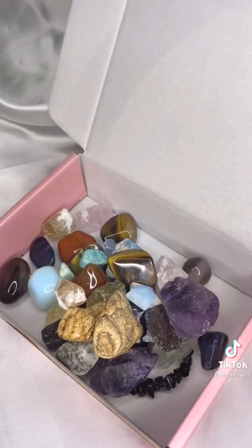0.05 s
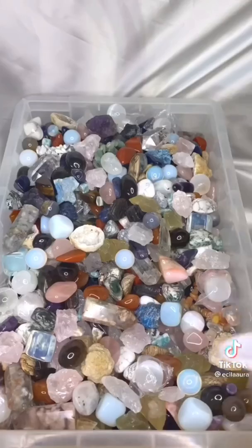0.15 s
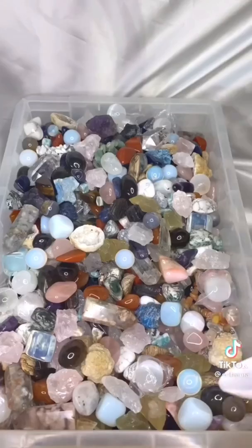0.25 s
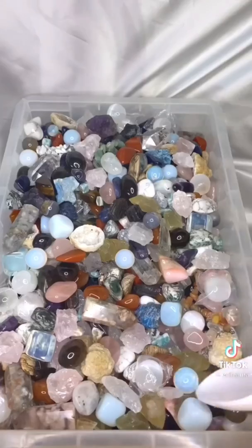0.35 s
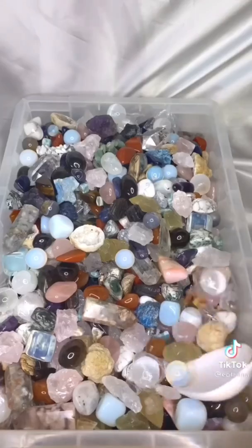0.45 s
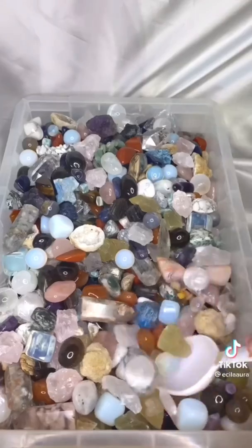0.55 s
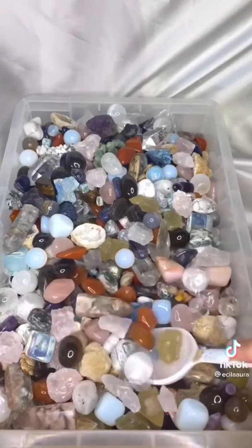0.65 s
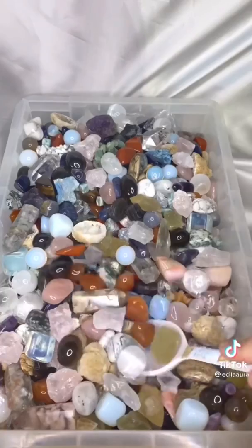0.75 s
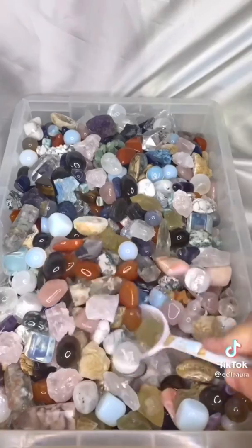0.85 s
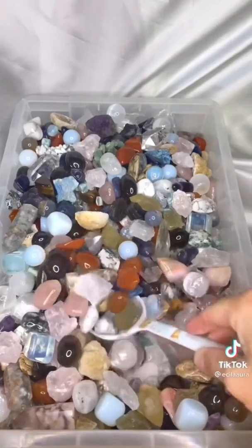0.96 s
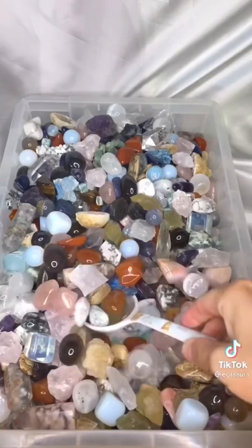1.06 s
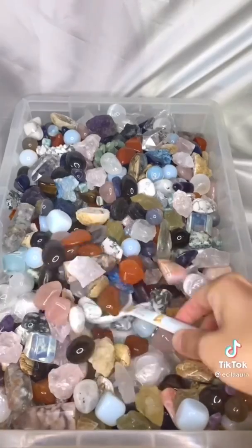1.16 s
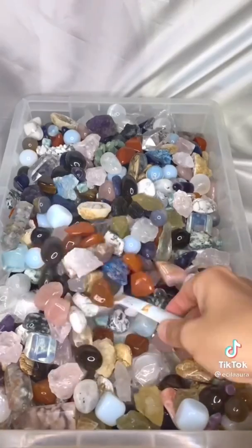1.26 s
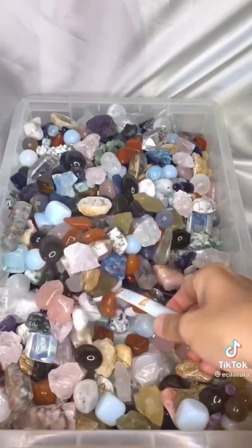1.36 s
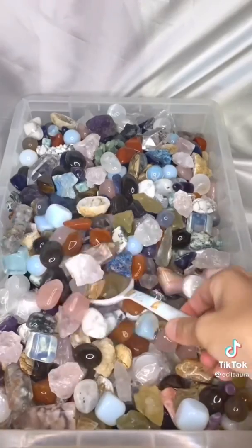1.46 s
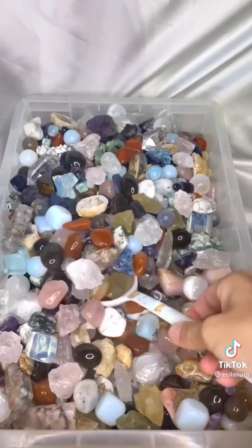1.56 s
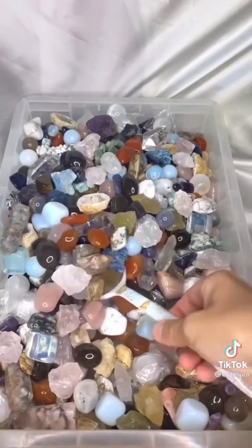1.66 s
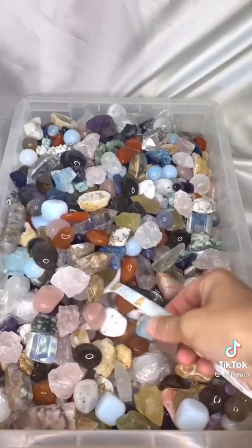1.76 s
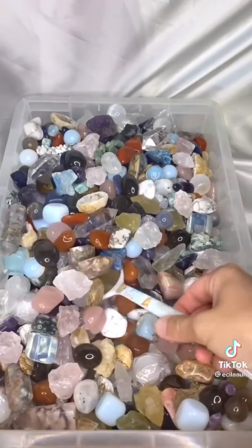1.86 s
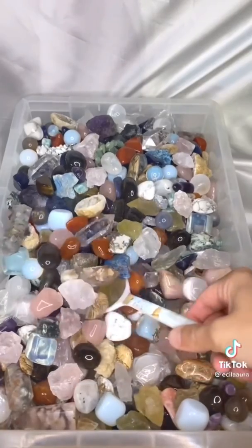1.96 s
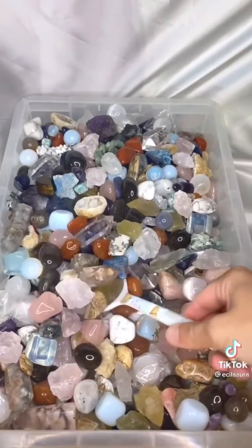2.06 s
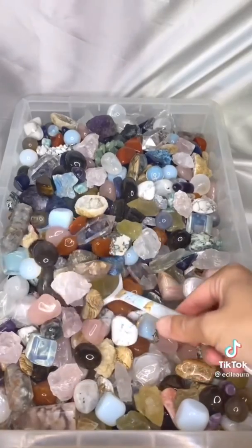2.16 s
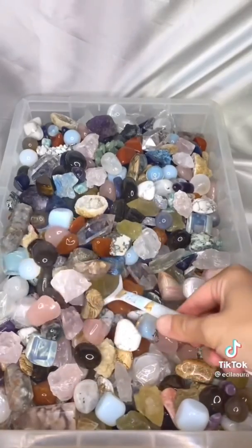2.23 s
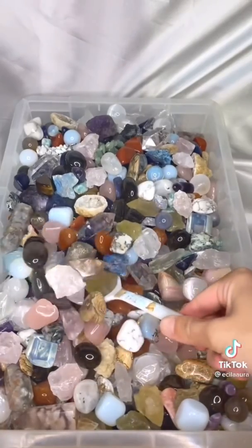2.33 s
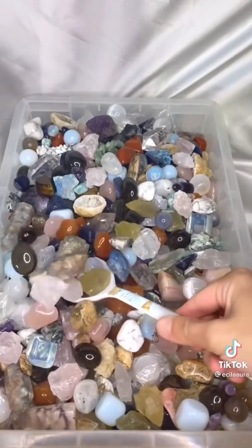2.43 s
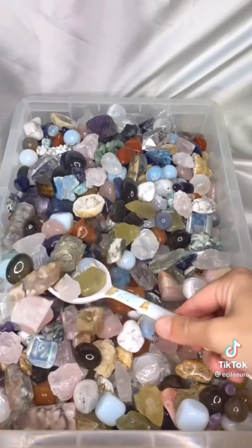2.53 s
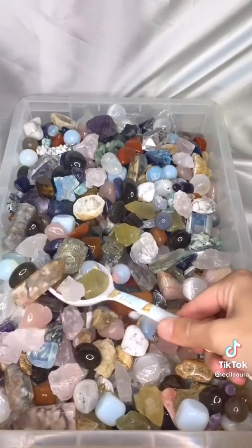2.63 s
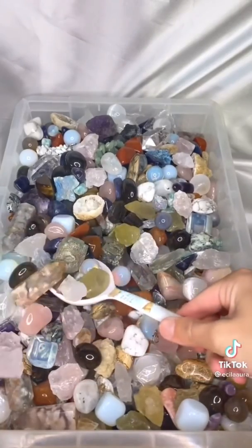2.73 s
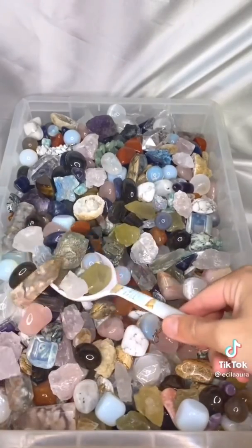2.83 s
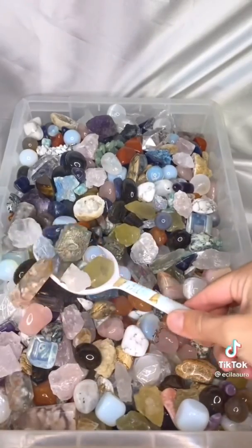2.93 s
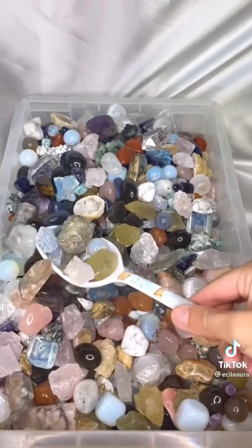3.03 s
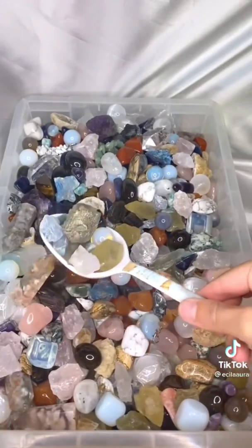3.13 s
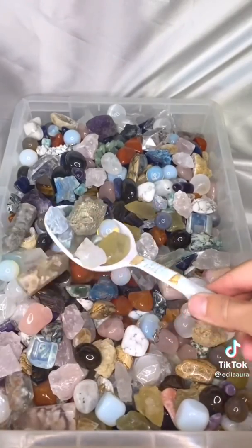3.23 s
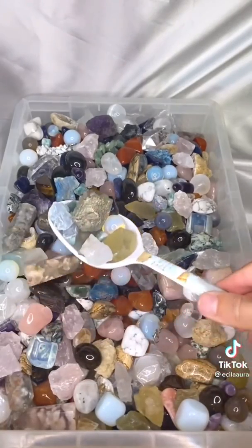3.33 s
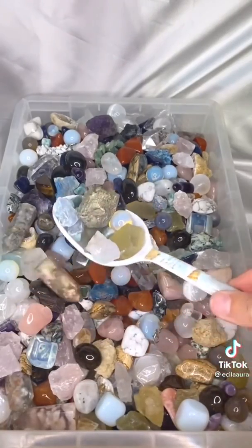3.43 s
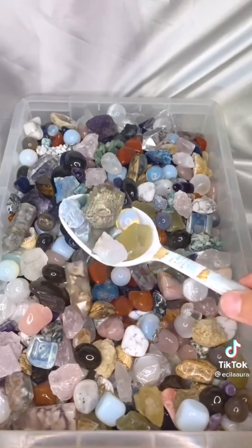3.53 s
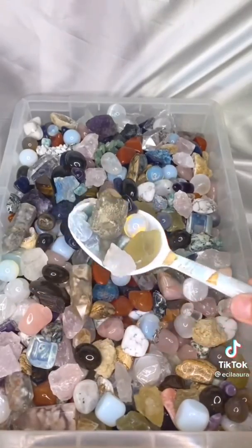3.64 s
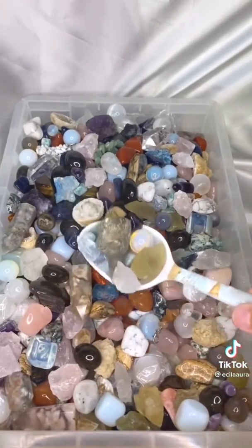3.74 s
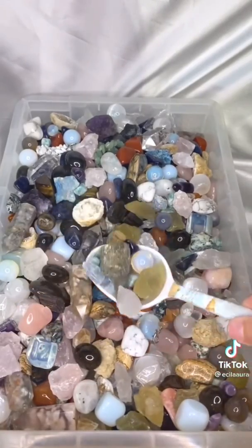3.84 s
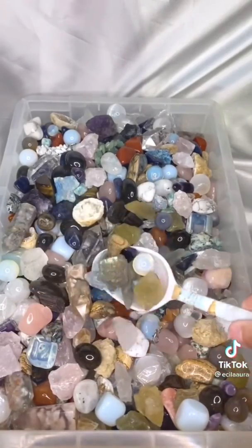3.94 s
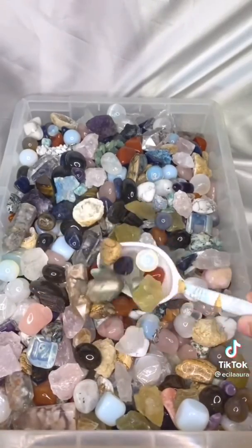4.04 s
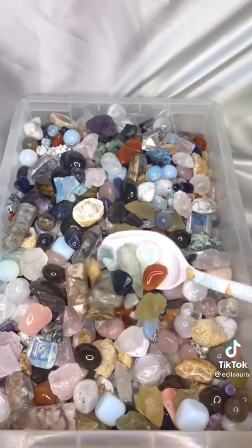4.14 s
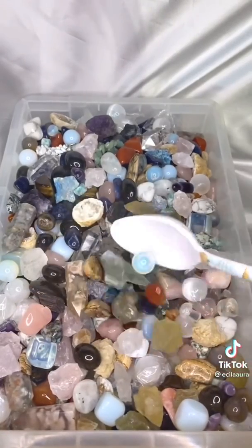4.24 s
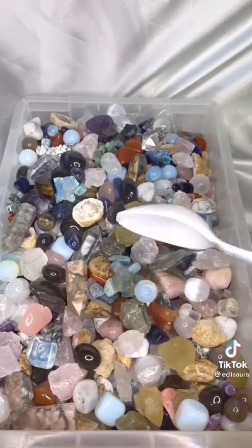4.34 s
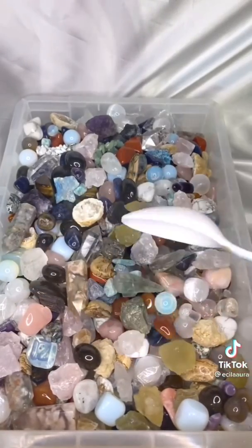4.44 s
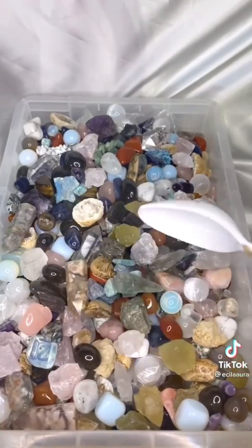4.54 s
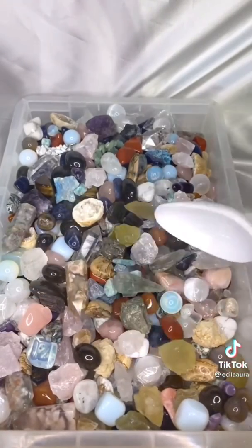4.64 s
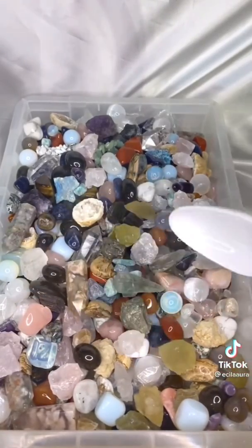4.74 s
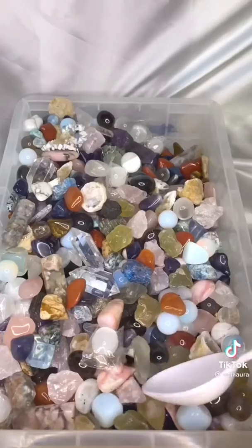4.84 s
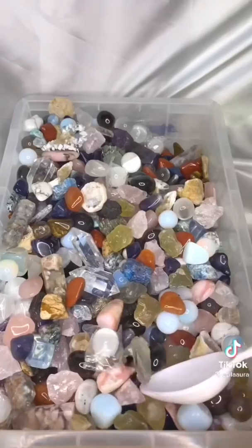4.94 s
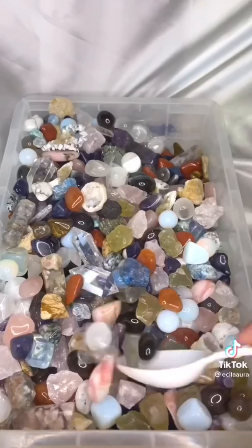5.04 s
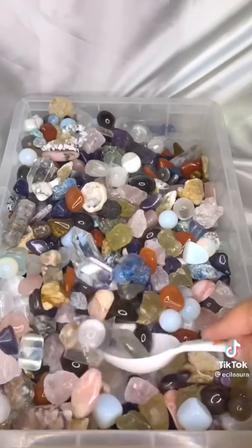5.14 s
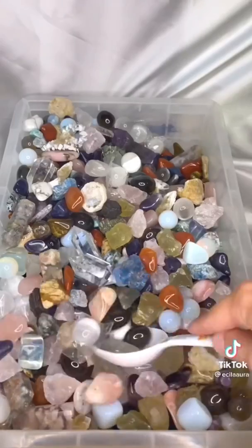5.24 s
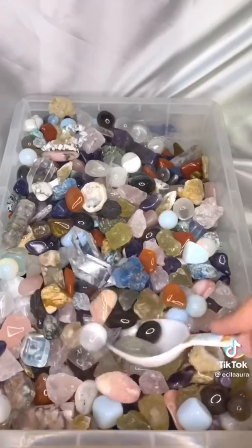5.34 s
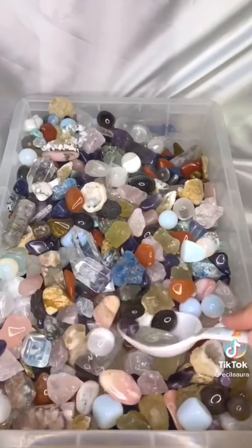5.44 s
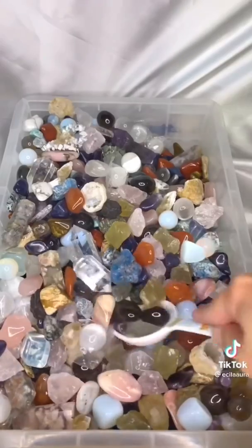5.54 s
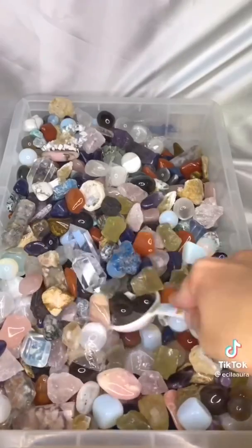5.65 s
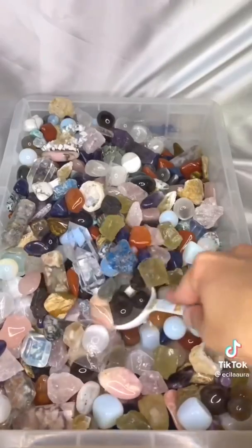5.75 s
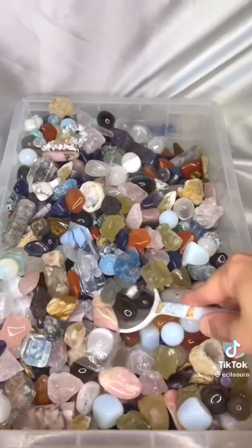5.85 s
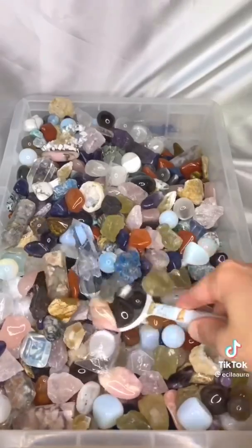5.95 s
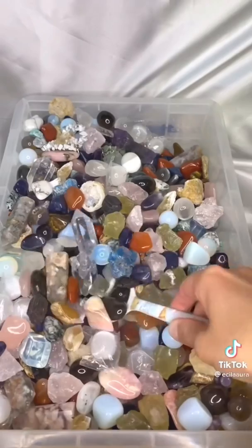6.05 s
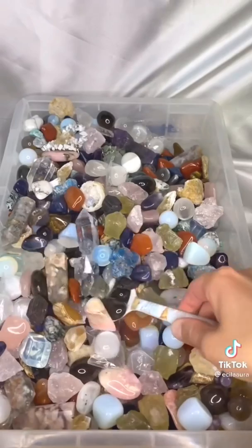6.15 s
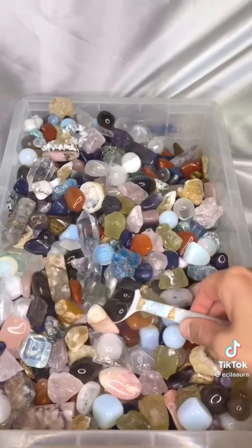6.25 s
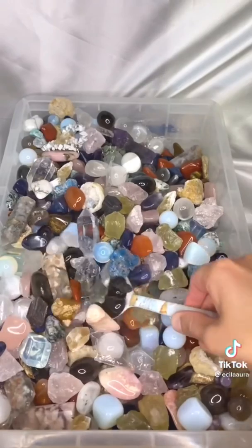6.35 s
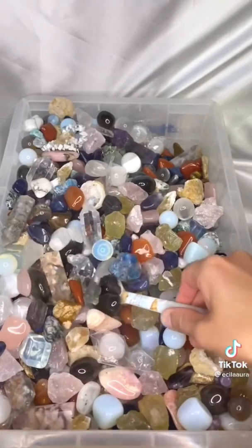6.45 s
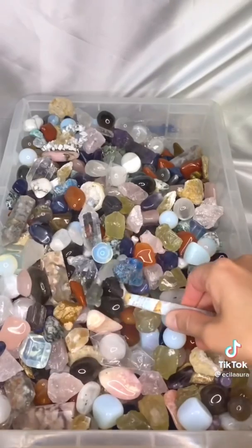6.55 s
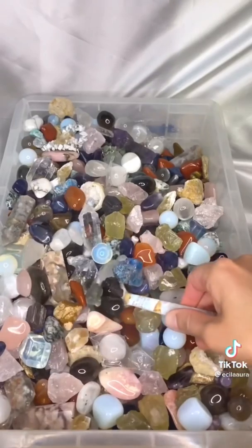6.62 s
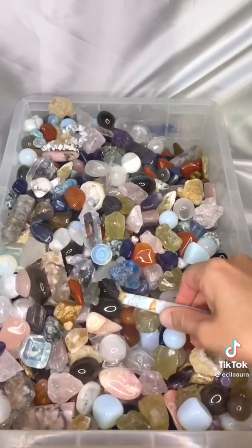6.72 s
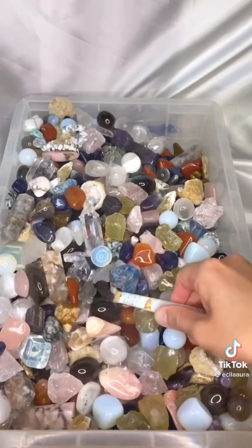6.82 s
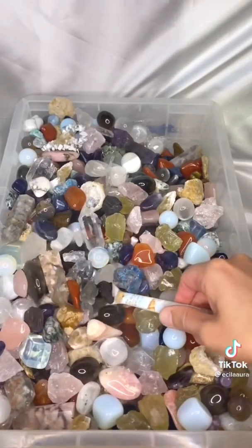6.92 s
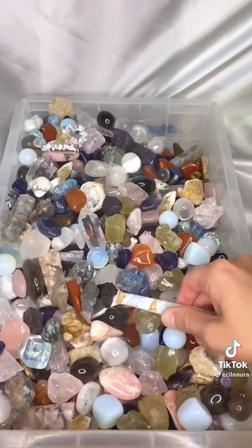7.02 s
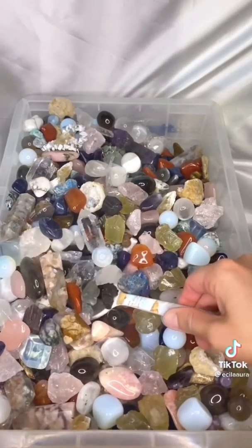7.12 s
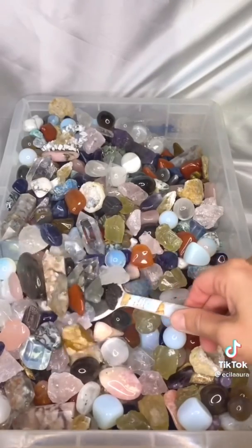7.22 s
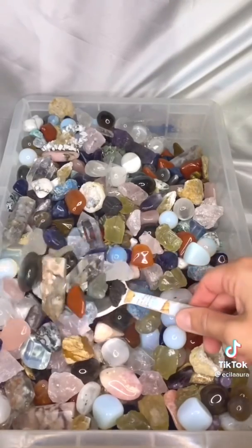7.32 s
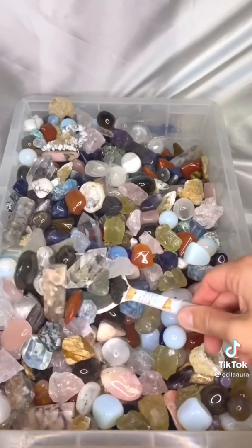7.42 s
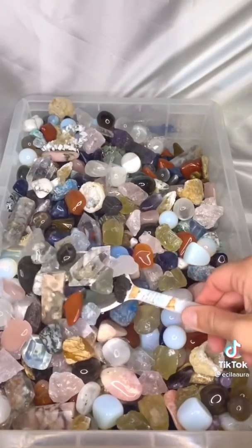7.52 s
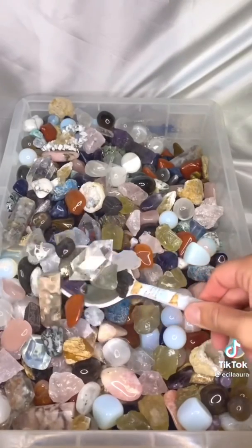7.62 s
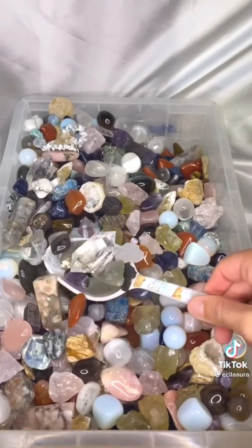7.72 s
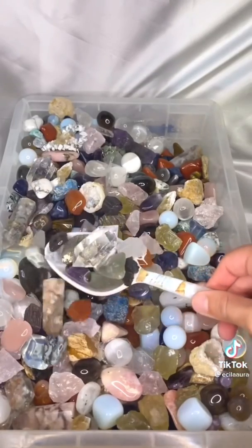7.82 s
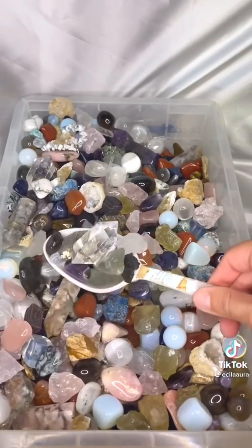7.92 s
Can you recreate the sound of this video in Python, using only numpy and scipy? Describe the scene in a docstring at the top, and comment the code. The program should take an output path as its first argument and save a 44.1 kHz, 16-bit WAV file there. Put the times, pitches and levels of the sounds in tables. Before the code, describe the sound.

Dense clatter of smooth pebbles being scooped, lifted and tipped back in a plastic bin, with a brief lull before digging starts again, recorded close.

```python
"""First a faint low rumble with a trace of hiss and a very faint rising squeak, then a loose stone rings. A
plastic scoop digs through a tub of polished stones, lifts a load, tips it back and digs again, close to two
microphones in a small room. Each clink is a knock of the packed heap, a clack of damped modes and a bright
tick. Loose stones ring with one pitch; pushed ones crunch in a dense random stream, and sliding ones sing. The
blows drive the tub's low resonances, soft thuds sound beneath, and a noise tail makes the room."""
import sys
import numpy as np
from scipy import signal
from scipy.fft import rfft, irfft
from scipy.io import wavfile
from scipy.ndimage import uniform_filter1d

SR = 44100
rng = np.random.default_rng(int(sys.argv[2]) if len(sys.argv) > 2 else 0)


def waveform_to_disk(signal):
    """Save audio, clipped to [-1, 1], as 16-bit WAV at the path in sys.argv[1]."""
    frames = np.transpose(np.atleast_2d(signal))
    scaled = np.clip(frames, -1, 1) * 32767
    samples = np.round(scaled).astype(np.int16)
    wavfile.write(sys.argv[1], SR, samples)


N = 351918
TIME = np.arange(N) / SR
AGE = np.arange(640) / SR  # s since a contact began
CONTACT_SAMPLES = .005 * SR  # a contact at 0 dB has the energy of 5 ms at rms 1
SCATTER_S = 0.0026  # how long reflections linger inside the tub
KNOCK_HZ = 888  # middle pitch of the clinks' knocks, and reference pitch for ringing stones


def from_db(db):
    """Amplitude ratio of a level in dB."""
    return 10 ** (np.asarray(db) / 20)


def rms_one(x):
    """Scale a signal to rms 1."""
    return x / np.sqrt(np.mean(x ** 2) + 1e-20)


def at_hz(rows, hz):
    """The columns of a table, read on a log-frequency axis."""
    points, *columns = np.transpose(rows)
    return np.array([np.interp(np.log(hz + 1), np.log(points), column) for column in columns])


def butter(x, hz, kind):
    """Filter with a second-order Butterworth design."""
    return signal.sosfilt(signal.butter(2, hz, kind, fs=SR, output="sos"), x)


def add(track, s, sound):
    """Mix a short sound into the stereo track at time s."""
    i = max(int(s * SR), 0)
    track[:, i:i + sound.shape[-1]] += sound[:, :max(N - i, 0)]


def floor():
    """A faint low rumble, alike at both microphones, under a trace of stereo hiss."""
    rumble = rms_one(butter(rng.standard_normal(N), 110, "low"))
    hiss = rms_one(butter(rng.standard_normal((2, N)), [300, 4500], "band"))
    return from_db(-64) * rumble + from_db(-77.5) * hiss


def squeak(s, length_s, db, hz, rise_hz_per_s):
    """A very faint squeak rises just before the first stone: two harmonics roughened by noise."""
    age = np.clip(TIME - s, 0, length_s)
    phase = 2 * np.pi * np.cumsum(hz + rise_hz_per_s * age) / SR
    grip = 1 + .5 * rms_one(butter(rng.standard_normal(N), 200, "low"))
    swell = np.sqrt(abs(np.sin(np.pi * age / length_s)))
    return from_db(db) * grip * swell * (np.sin(phase) + .5 * np.sin(2 * phase))


def reflection_spread():
    """Swell and decay of the quick reflections inside the tub, with unit energy."""
    spread = np.sqrt(AGE) * np.exp(-AGE / SCATTER_S)
    return spread / np.linalg.norm(spread)


def contacts(low_hz, high_hz, pitch, rock_s, cycles, unlike, scatter, order):
    """Stereo contacts of stones of relative `pitch`: `order` damped modes each, scattered inside the tub."""
    place, delay, damping = rng.random((3, len(pitch), order, 1))
    shared, apart = rng.standard_normal((2, len(pitch), order, 1))
    octave_share = (np.arange(order)[:, None] + place) / order
    hz = pitch[:, None, None] * low_hz * (high_hz / low_hz) ** octave_share
    # an uneven stone rocks onto several points in quick succession; its neighbours damp it within a few cycles
    age = np.maximum(AGE - rock_s * delay ** 2, 0)
    decay = hz / (cycles * 2 ** (2 * damping - 1))
    modes = np.sqrt(decay) * np.exp(-decay * age) * np.sin(2 * np.pi * hz * age)
    # every mode radiates a little differently towards each microphone
    weight = np.sign(shared) + unlike * apart * np.array([1, -1])
    sound = weight.transpose(0, 2, 1) @ modes
    # each spot in the tub has its own quick reflections off walls and other stones
    common = rng.standard_normal((len(pitch), 1, len(AGE)))
    echoes = common + unlike * rng.standard_normal((len(pitch), 2, len(AGE)))
    reflected = signal.fftconvolve(sound, echoes * reflection_spread(), axes=-1)[..., :len(AGE)]
    sound = butter(sound + scatter * reflected, low_hz * 0.5, "high")
    energy = np.mean(np.sum(sound ** 2, axis=-1, keepdims=True), axis=1, keepdims=True)
    return sound / np.sqrt(energy / CONTACT_SAMPLES)


def stones(count, rock_s, cycles, order):
    """Clack and tick of assorted stones; each clack has `order` modes that ring for about `cycles`."""
    pitch = 2 ** (.22 * np.clip(rng.standard_normal(count), -1.6, 1.2))
    clack = contacts(1714, 6465, pitch, rock_s, cycles=cycles, unlike=0.29, scatter=0.78, order=order)
    tick = contacts(6800, 15000, np.ones(count), rock_s, cycles=10.0, unlike=.25, scatter=.8, order=8)
    return clack, tick


# loose stones that ring with one clear pitch: t/s, ring level/dB, f/Hz, clack level/dB relative to the ring
RINGING_STONES = [(0.1808, -20, 890, -4), (0.6578, -28, 1370, 0), (0.9718, -22.5, 890, -19),
                  (1.2564, -16.5, 824, -7), (2.0934, -30.5, 1250, -4), (2.449, -15, 1135, -11),
                  (2.474, -23.5, 1170, -19), (2.5069, -18, 1155, -5.5), (2.946, -31.5, 2863, 4),
                  (3.4614, -38.5, 1710, -11), (3.699, -43.5, 2790, 3), (3.7813, -43, 2900, -10),
                  (3.8194, -33, 2780, 4), (4.848, -31, 4005, -4), (5.1612, -16.5, 3682, -13),
                  (6.391, -22, 950, -34), (6.881, -27.5, 2820, 3.5), (6.9305, -22, 1227, -4.5),
                  (6.9458, -20, 830, -16), (7.002, -22.5, 1150, -4.5), (7.009, -23.5, 900, -13),
                  (7.1109, -21, 824, -6), (7.7928, -22.5, 1730, 3)]


def tocks(ring_s, shorter_with_pitch, tick_db):
    """A loose stone swings a few times at its own pitch under its clack; higher-pitched stones stop sooner."""
    out = np.zeros((2, N))
    clacks, ticks = stones(len(RINGING_STONES), rock_s=0.001855, cycles=1.6, order=9)
    for (s, db, hz, clack_db), clack, tick in zip(RINGING_STONES, clacks, ticks):
        swing = AGE / (ring_s * (hz / KNOCK_HZ) ** -shorter_with_pitch)
        tone = np.sqrt(swing) * np.exp(-swing) * np.sin(2 * np.pi * hz * AGE)
        tone = tone / np.sqrt(np.sum(tone ** 2) / CONTACT_SAMPLES)
        add(out, s, from_db(db) * (tone + from_db(clack_db) * (clack + from_db(tick_db) * tick)))
    return out


# resonances of the loaded tub: f/Hz, width/Hz, level/dB before the drive
TUB_MODES = [(68, 35, -2), (98, 50, -3), (158, 45, 3.5), (240, 70, -6), (315, 70, 2.5), (405, 55, -1.5),
             (484, 30, 1.5)]


def tub(x, drive_db, harder, ref_db, wander, linger_s):
    """Jolts of the heap shake the plastic walls, hard ones most; the boom lingers and wanders as the load shifts."""
    power = uniform_filter1d(butter(x[0], 700, "high") ** 2, SR // 150)
    force = np.sqrt(abs(power))
    force = force * (force / from_db(ref_db) + .1) ** harder
    keep = np.exp(-1 / (linger_s * SR))
    shaking = np.sqrt(signal.lfilter([1 - keep], [1, -keep], force ** 2))
    jolts = shaking * rng.standard_normal(N)
    out = 0
    for hz, width_hz, db in TUB_MODES:
        boom = signal.lfilter(*signal.iirpeak(hz, hz / width_hz, fs=SR), jolts)
        sway = rms_one(butter(rng.standard_normal(N), [3, 9], "band"))
        warped_time = TIME + wander * np.cumsum(sway) / SR
        out = out + from_db(db + drive_db) * np.interp(warped_time, TIME, boom)
    return out


# tail of the small room: f/Hz, t60/s, weight of the noise tail/dB
ROOM_TAIL = [(98, 0.29, -8), (278, 0.1, -7), (790, 0.021, -16), (1960, 0.16, -12.5), (4740, 0.24, -9.5),
             (12800, 0.018, -8)]


def room(x, alike):
    """Diffuse tail of noise bands, each with its own decay; at alike = 1 both channels share one tail."""
    age, edges = TIME[:SR // 2], np.geomspace(50, 18000, 10)
    response, c = 0, np.clip(alike, 0, 1)
    for low, high in zip(edges, edges[1:]):
        t60, db = at_hz(ROOM_TAIL, np.sqrt(low * high))
        mid, side = butter(rng.standard_normal((2, len(age))), [low, high], "band")
        noise = np.sqrt((1 + c) / 2) * mid + np.sqrt((1 - c) / 2) * side * [[1], [-1]]
        tail = from_db(-60 * age / t60) * (age > .005)  # silent for the first 5 ms
        response = response + noise * from_db(db) * tail / np.linalg.norm(tail)
    return signal.fftconvolve(x, response, axes=-1)[:, :N]


def knock(hz, width, scatter):
    """The packed heap takes a blow as one short band-limited pulse, with quick reflections in stereo."""
    pulse = butter(AGE == 0, [hz / (1 + width), hz * (1 + width)], "band")
    echoes = rng.standard_normal(len(AGE)) + 0.36 * rng.standard_normal((2, len(AGE)))
    echoes = echoes * reflection_spread()
    pulse = pulse + scatter * signal.fftconvolve(pulse[None], echoes, axes=-1)[:, :len(AGE)]
    return rng.choice([-1, 1]) * pulse / np.sqrt(np.sum(pulse ** 2) / 2 / CONTACT_SAMPLES)


# steady drag of the scoop in the heap, one curve for each dig: t/s, relative push level/dB
DRAG_CURVES = [
    [(0.26, -39.5), (0.31, -32), (1.0, -26.5), (1.5, -31), (1.73, -41.5), (2.3, -46.5), (2.75, -38.5),
     (3.18, -49), (3.65, -67.5), (3.88, -57)],
    [(4.76, -32), (5.2, -28.5), (5.7, -31), (6.15, -35.5), (6.57, -48.5), (6.8, -35.5), (7.1, -29),
     (7.52, -36), (7.98, -57)],
]
DRAG_BRIGHT_DB = 3.5  # clack over knock
# shoves of the hand, each setting a patch of stones sliding:
# start t/s, attack/s, hold/s, relative push level/dB, brightness/dB (clack over knock)
HAND_SHOVES = [(0.268, 0.094, 0.24, -17, 5.5), (0.741, 0.052, 0.11, -16.5, 2.5),
               (1.071, 0.011, 0.019, -20, 4.5), (1.126, 0.055, 0.044, -27, 7.5),
               (1.318, 0.022, 0.097, -24.5, -0.5), (1.52, 0.056, 0.018, -22, 7),
               (1.758, 0.072, 0.061, -24.5, 8), (1.962, 0.037, 0.1, -34.5, 3),
               (2.123, 0.24, 0.078, -25.5, 8), (2.404, 0.094, 0.075, -21.5, 6),
               (2.905, 0.13, 0.045, -23, 9), (4.006, 0.11, 0.18, -22.5, 11.5),
               (4.752, 0.003, 0.0085, -19, 16.5), (4.921, 0.034, 0.1, -19.5, 9),
               (4.993, 0.046, 0.08, -18, 1), (5.237, 0.07, 0.065, -22.5, 5.5),
               (5.438, 0.071, 0.012, -19, 8), (5.553, 0.028, 0.027, -20, 4),
               (5.668, 0.054, 0.015, -26.5, 8.5), (5.842, 0.1, 0.041, -17, 8.5),
               (6.224, 0.11, 0.045, -21.5, 6.5), (6.591, 0.091, 0.0061, -34, 3.5),
               (6.902, 0.036, 0.067, -35, -8), (7.102, 0.033, 0.013, -25, 7),
               (7.165, 0.059, 0.12, -22, 4.5), (7.561, 0.07, 0.031, -25.5, 7), (7.698, 0.051, 0.11, -28, 5)]
SAG_DB_PER_S, RELEASE_DB_PER_S = 12.5, 196.5  # a shove eases while it lasts; after the hold the stones come to rest
# a struck stone unsettles its neighbours for a moment
SETTLE_DB, SETTLE_DB_PER_S, SETTLE_BRIGHT_DB = -9.5, 320.5, -1
GRIP_DB = -32  # blows weaker than this hardly shift the neighbours


def pushing(t):
    """Level and brightness (dB) of the sliding stones at times t: drag, shoves and settling after each blow."""
    parts = []
    for dig in DRAG_CURVES:
        drag_db = np.interp(t, *np.transpose(dig), left=-120, right=-120)
        parts.append((from_db(drag_db), DRAG_BRIGHT_DB))
    for s, attack_s, hold_s, db, bright_db in HAND_SHOVES:
        held = np.maximum(t - s - attack_s, 0)
        fall_db = SAG_DB_PER_S * held + RELEASE_DB_PER_S * np.maximum(held - hold_s, 0)
        parts.append((np.clip((t - s) / attack_s, 0, 1) * from_db(db - fall_db), bright_db))
    blows = [(s, from_db(db) * np.hypot(1, from_db(knock_db))) for s, db, knock_db, _ in DISTINCT_CLINKS]
    blows += [(s, from_db(db)) for s, db, _, _ in RINGING_STONES]
    for s, force in blows:
        jolt = (t > s) * force ** 2 / (force + from_db(GRIP_DB))
        settling = from_db(SETTLE_DB - SETTLE_DB_PER_S * np.clip(t - s, 0, 1))
        parts.append((jolt * settling, SETTLE_BRIGHT_DB))
    power = sum(level ** 2 for level, _ in parts)
    bright_db = sum(level ** 2 * part_db for level, part_db in parts) / power
    return 10 * np.log10(power), bright_db


def crunch(per_s, crowding, spread_db, tick_db, glint, even_s):
    """Pushed stones slip at random: the harder the push, the more contacts a second."""
    clack, tick = stones(count=280, rock_s=0.000863, cycles=4.7, order=4)
    knock_pitches = 1050 * 2 ** (0.35 * rng.standard_normal(len(clack)))
    knocks = [knock(hz, width=0.39, scatter=0.52) for hz in knock_pitches]
    slots = np.arange(0, N, 32) / SR  # at most one slip in each slot
    slot_s = slots[1]
    chance, size, pick, jitter = rng.random((len(slots), 4)).T
    push_db, bright_db = pushing(slots)
    tilt_db = bright_db + 4.06 * rng.standard_normal(len(slots))
    rate = per_s * from_db(crowding * (push_db - push_db.max()))
    strength = from_db(spread_db * np.minimum(-np.log(1 - size), 4))
    out = np.zeros((2, N))
    for i in np.flatnonzero(chance < rate * slot_s):
        # buried stones mostly knock; those on top clack and glint
        k, bright = int(pick[i] * len(knocks)), from_db(tilt_db[i] / 2)
        clack_and_tick = clack[k] + from_db(tick_db + glint * tilt_db[i]) * tick[k]
        sound = knocks[k] / bright + bright * clack_and_tick
        add(out, slots[i] + jitter[i] * slot_s, strength[i] * sound)
    # the scoop's work is shared among the contacts of the moment
    power = uniform_filter1d(np.mean(out ** 2, axis=0), int(even_s * SR))
    power = uniform_filter1d(power, int(even_s * SR / 2))
    evened = out / np.sqrt(abs(power) + 0.15)
    return evened * from_db(np.interp(TIME, slots, push_db) - 3.5)


# contacts that stand out close to the microphones: t/s, clack level/dB before the common trim,
# knock level/dB and tick level/dB, both relative to the clack
DISTINCT_CLINKS = [(0.266, -22.5, -22, -6), (0.2911, -18.5, -2.5, -11), (0.318, -33.5, 11, -17.5),
                   (0.346, -21, -8, -17.5), (0.3847, -16, -1, -12.5), (0.4424, -18, -1, 2.5),
                   (0.4565, -29, -6, -10), (0.4689, -22.5, 1.5, -8), (0.549, -26, -3, 6),
                   (0.5768, -32, -18, 14), (0.73, -34, 2, 7), (0.7632, -40.5, 14, -10),
                   (0.8043, -24.5, 8, 3), (0.8933, -32, 7, -2), (0.9084, -23.5, -3, 5),
                   (0.9484, -28.5, 6.5, -21.5), (1.0001, -20.5, -25, -0.5), (1.0659, -16, -20, -7),
                   (1.2028, -28, -2, 4), (1.2958, -39, 12.5, -16), (1.3341, -22, -9, -0.5),
                   (1.354, -21.5, 10, 5), (1.3933, -22.5, 3, 3), (1.411, -28, 8.5, 13),
                   (1.477, -21, -1.5, 2), (1.644, -29, -15.5, -8), (1.7505, -33.5, -11, -0.5),
                   (1.798, -25.5, -14, -11), (1.8742, -25.5, -6, 3.5), (1.994, -36.5, -14, -1.0),
                   (2.005, -32.5, -8, -16), (2.0558, -33, 2.5, -20), (2.159, -37, -7, -0.5),
                   (2.171, -30, -24, -8.5), (2.225, -23.5, -28, 0.5), (2.2933, -23.5, -11, -18),
                   (2.3036, -19.5, -0.5, -20), (2.3257, -26.5, 1.5, -7), (2.369, -31.5, 10, -8),
                   (2.385, -25, -6, 1.5), (2.4167, -21, -11, 4.5), (2.435, -25.5, 3.5, -10),
                   (2.4828, -19, 1.5, -15), (2.5346, -30, 5, -6), (2.5542, -32.5, 9.5, 11),
                   (2.598, -31.5, -3.0, 6), (2.6138, -36.5, -6.5, 9), (2.6651, -28.5, -5, -0.5),
                   (2.6694, -28.5, -6, -0.5), (2.7577, -35.5, -23, -1), (2.7902, -29, -12, 2),
                   (2.7985, -34.5, -2, 9), (2.8952, -37.5, -4, 5), (2.9978, -20.5, -3, -11),
                   (3.0054, -21.5, -4.5, -5), (3.0285, -20.5, -4, -1), (3.0674, -25, -2, 0),
                   (3.0803, -26.5, 1, 1), (3.1222, -26, -5, -4), (3.1396, -18.5, -3, 1.5),
                   (3.185, -30.5, -3, 5.5), (3.247, -34, -12, -0.5), (3.2595, -42.5, -10, 2),
                   (3.3106, -34, -4, 2), (3.3406, -33.5, -4.5, -7), (3.3594, -31.5, -3.5, 4),
                   (3.401, -31.5, -13, -5), (3.4235, -36.5, -4, -27), (3.4338, -28.5, -7.5, -22),
                   (3.4921, -35.5, -12, 6.5), (3.5039, -27, -5, 2), (3.537, -37.5, -0.5, -6),
                   (3.5707, -45, -20, 2), (3.89, -23, -17, -4), (3.8938, -20.5, 3, -1),
                   (3.945, -19.5, -8, -2.5), (3.9864, -27.5, -13, -3.5), (4.018, -22, -2, -12),
                   (4.0206, -18, -3.5, 1), (4.084, -30.5, -21, 10.5), (4.1068, -26.5, -9, 3),
                   (4.1349, -26, 6.5, 5), (4.1436, -17, -6.5, -8.5), (4.166, -27.5, -3, 12),
                   (4.1835, -17, -3.5, -3.5), (4.215, -25.5, -0.5, 11), (4.2404, -20.5, -9, 8.5),
                   (4.2755, -21.5, -2.5, 4.5), (4.3334, -31, -5, 5.5), (4.363, -24, -3, 0),
                   (4.3754, -33, -7, -1), (4.425, -35, -9.5, -3), (4.44, -33.5, -12, 1),
                   (4.4928, -29, -12, -4.5), (4.52, -38, -6.5, -9), (4.677, -65.5, -5, -20.0),
                   (4.7525, -21, -4, 6.5), (4.779, -26.5, -3, 7), (4.9553, -18.5, -2, -7),
                   (4.9738, -22, -9, 10), (5.0554, -19, -8, 1), (5.0762, -21.5, -19, -2.5),
                   (5.0973, -22, 1, -23), (5.1492, -19.5, -3, -24), (5.2611, -18.5, -9.5, -3.5),
                   (5.382, -27, -1, 8), (5.425, -37, -7.0, 10), (5.4426, -21.5, -19, -4),
                   (5.5283, -18, -28, 6), (5.581, -21.5, -19, -15), (5.643, -21, -24, -21),
                   (5.7388, -32.5, 0, 7), (5.891, -26, -2.5, -3), (6.0002, -24, -2, -3),
                   (6.0367, -32, 1, -12), (6.0471, -24.5, -4.5, -13), (6.092, -27.5, -22, -9),
                   (6.1177, -26.5, -29, -6), (6.4742, -33.5, -1, -6), (6.558, -41.5, -34, 3),
                   (6.631, -41, -14, -17), (6.6877, -22.5, -7, -10), (6.7152, -28.5, -22, -21),
                   (6.7573, -30.5, -10, -21), (6.8187, -27.5, -6.5, 1.5), (6.84, -28, -19, -13.5),
                   (6.8938, -25.5, -3, -4), (6.952, -27.5, -8, 2.5), (7.0532, -26.5, 5, 7.5),
                   (7.1557, -26.5, 2, -3), (7.1649, -24.0, -25, -22), (7.2081, -34.5, 9, -6),
                   (7.233, -17.5, 0, 1), (7.2626, -20.5, -3, -3), (7.28, -20, 1, -20),
                   (7.389, -21, -1.5, 4.5), (7.4424, -16.5, 4, -27), (7.4582, -25, 1, 3),
                   (7.4952, -32.5, -1, -9), (7.5293, -38.5, 6.5, -4.5), (7.5802, -27.5, 1, 2),
                   (7.609, -26.5, -8, 7), (7.617, -24.5, 3, -3), (7.6266, -24.5, -2, 8.5),
                   (7.6615, -22.5, -1, -6), (7.685, -25, -4.5, -0.5), (7.75, -28, -0.5, 3.5),
                   (7.8222, -23.5, -7, -4), (7.8279, -28, 2, 3), (7.9085, -45, -8, 11),
                   (7.9607, -40.5, -3, -3)]
KNOCK_OCTAVES_PER_DB = 0.022  # the more a contact knocks, the heavier the stone and the lower the knock
ROCK_BACK_S, ROCK_BACK_DB = 0.00239, -8.5  # an uneven stone lands again after 0.5 to 1.5 times this delay


def clinks():
    """Single stones fall, flip or slip off the scoop, knock and rock back once; heavy knocks tend to be low."""
    out = np.zeros((2, N))
    clacks, ticks = stones(len(DISTINCT_CLINKS), rock_s=0.001717, cycles=2.5, order=7)
    for (s, db, knock_db, tick_db), clack, tick in zip(DISTINCT_CLINKS, clacks, ticks):
        octaves = 0.11 * np.clip(rng.standard_normal(), -2, 2) - KNOCK_OCTAVES_PER_DB * knock_db
        hz = KNOCK_HZ * 2 ** octaves
        add(out, s, from_db(db) * (clack + from_db(tick_db) * tick))
        rock_back_s = ROCK_BACK_S * (.5 + rng.random())
        for delay_s, blow_db in ((0.0005, -1), (rock_back_s, ROCK_BACK_DB)):
            blow = knock(hz, width=0.59, scatter=0.26)
            add(out, s + delay_s, from_db(db + knock_db + blow_db) * blow)
    return from_db(-0.32) * out  # common trim


def sliding(s, length_s, db, modes, slips_per_s):
    """Quick uneven slips ring the given resonances during one slide; the pitch wavers with the grip."""
    out, age = np.zeros((2, N)), TIME[:SR // 2]
    slips = (rng.random(len(age)) < slips_per_s / SR) * rng.standard_normal(len(age)) + 1e-18
    slips[SR // 1000] = 1  # the stone breaks loose
    sung = 0
    for hz, width_hz, mode_db in modes:
        ring = signal.lfilter(*signal.iirpeak(hz, hz / width_hz, fs=SR), slips)
        ring = butter(ring, [hz / 2, min(hz * 2, SR / 3)], "band")
        sung = sung + from_db(mode_db) * rms_one(ring)
    grip = rms_one(butter(rng.standard_normal(len(age)), 20.3, "low"))
    sung = np.interp(np.cumsum(1 + .035 * grip) / SR, age, sung)
    swell = np.sqrt(abs(np.sin(np.pi * np.minimum(age / length_s, 1))))
    add(out, s, from_db(db) * (rms_one(sung) * swell)[None])
    return out


# a stone slides and sets one resonance singing: t/s, length/s, level/dB, f/Hz, width as a share of f
STONE_SCRAPES = [(1.059, 0.037, -22, 3880, 0.08), (1.066, 0.028, -27, 3030, 0.084),
                 (3.764, 0.22, -46, 2900, 0.056), (5.097, 0.041, -18.5, 3700, 0.19)]
# the scoop's bowl rubs along the stones: t/s, length/s, level/dB
BOWL_RUBS = [(1.779, .15, -36.5), (2.213, 0.26, -31), (6.419, 0.19, -68)]
# resonances of the bowl: f/Hz, width/Hz, relative level/dB
BOWL_MODES = [(1230, 130, -4.5), (1680, 100, -10.5), (2550, 250, -2)]


def scrapes(slips_per_s):
    """Sliding stones sing at a pitch of their own; the bowl rubs with its three resonances."""
    out = np.zeros((2, N))
    for s, length_s, db, hz, share in STONE_SCRAPES:
        out += sliding(s, length_s, db, [(hz, hz * share, 0)], slips_per_s)
    for s, length_s, db in BOWL_RUBS:
        out += sliding(s, length_s, db, BOWL_MODES, slips_per_s)
    return out


# soft thuds of the tub on its cloth: t/s, level/dB, f/Hz
TUB_THUDS = [(2.715, -30.5, 86), (4.028, -28, 76), (4.685, -38.5, 90), (4.783, -30, 79.4),
             (7.842, -29.5, 131)]


def thuds(swell_s):
    """The tub shifts on its cloth: a low sine swells for `swell_s` and dies away."""
    out, age = np.zeros((2, N)), TIME[:SR // 4]
    for s, db, hz in TUB_THUDS:
        swell = age / swell_s * np.exp(1 - age / swell_s)
        add(out, s, from_db(db) * (swell * np.sin(2 * np.pi * hz * age))[None])
    return out


def scene():
    """Stones, crunch, tub and scrapes feed the room; thuds, floor and squeak stay outside its tail."""
    heap = tocks(ring_s=0.0011, shorter_with_pitch=0.22, tick_db=-5.5) + clinks()
    heap = heap + crunch(per_s=560, crowding=.22, spread_db=2.0, tick_db=-14.0, glint=1.0, even_s=0.083)
    boom = tub(heap, drive_db=3.0, harder=0.15, ref_db=-20, wander=0.03, linger_s=0.011)
    heap = heap + boom + scrapes(slips_per_s=330)
    faint = floor() + squeak(0.064, 0.1, db=-72, hz=1450, rise_hz_per_s=1000)
    return heap + room(heap, alike=1.0) + thuds(swell_s=0.0054) + faint


# colour of the two close microphones: f/Hz, left level/dB, right level/dB
MICROPHONE_COLOUR = [(61, -3.5, -3), (156.3, -1.5, -4.5), (228, -11, -10), (416, -2, -4.5), (736, 0, 2.5),
                     (1310, 2, 5.5), (2090, 0.5, 1), (2560, -3, 4.5), (5080, -2, 1), (6030, 2.5, 3),
                     (6840, 1, 1), (9800, -8, -7.5), (12550, -3.5, -3)]
# phase of the left channel ahead of the right: f/Hz, phase/radians
CHANNEL_PHASE = [(100, 0), (750, 0.8651), (1300, 0.5), (2100, -0.25), (4100, 1.13), (7900, 2.5),
                 (13000, 3.5), (15000, 5)]


def record(dry):
    """Each microphone has its colour; the channels differ in phase, mostly in the treble; deep bass and top are cut."""
    hz = np.arange(N // 2 + 1) * SR / N
    half_phase = .5j * at_hz(CHANNEL_PHASE, hz) * np.array([[1], [-1]])
    response = from_db(at_hz(MICROPHONE_COLOUR, hz)) * np.exp(half_phase)
    heard = butter(irfft(rfft(dry) * response, N), 77, "high")
    heard = np.clip(heard, -.75, .75)
    return signal.sosfilt(signal.ellip(10, .2, 80, 15800, fs=SR, output="sos"), heard)


dry = scene()
out = record(dry)
waveform_to_disk(out)
```